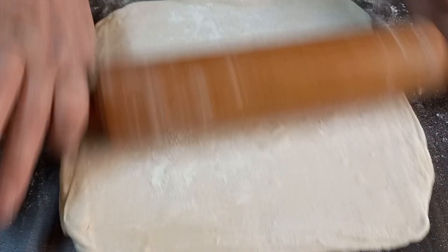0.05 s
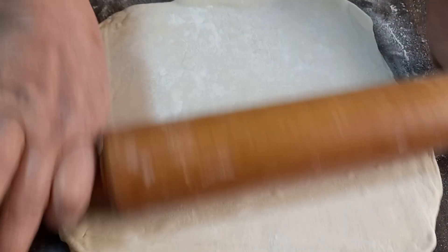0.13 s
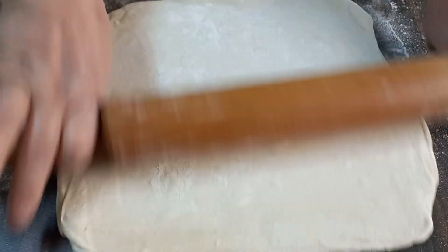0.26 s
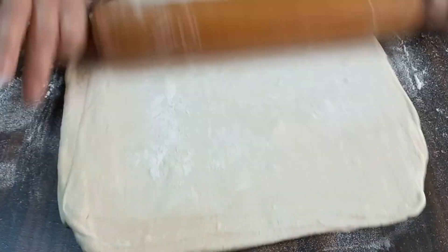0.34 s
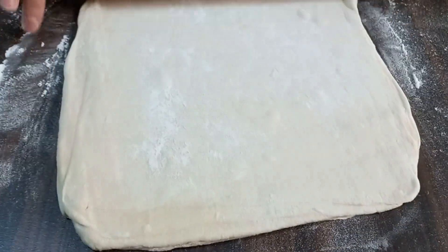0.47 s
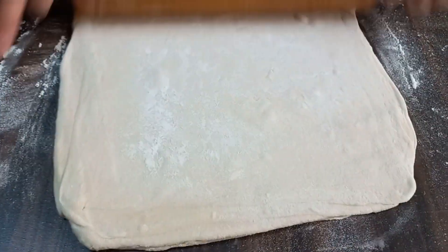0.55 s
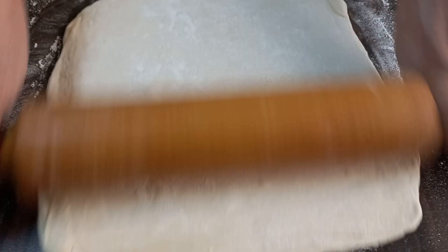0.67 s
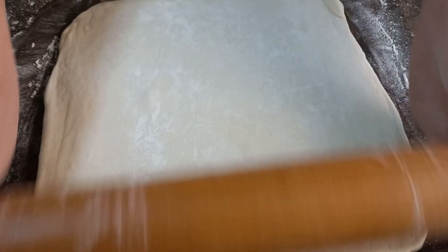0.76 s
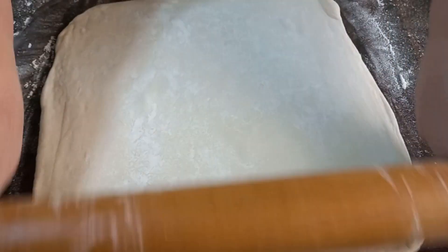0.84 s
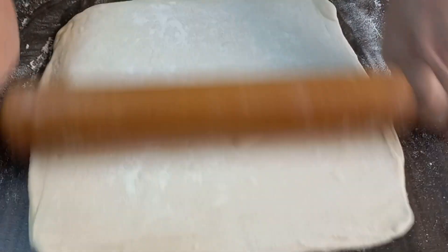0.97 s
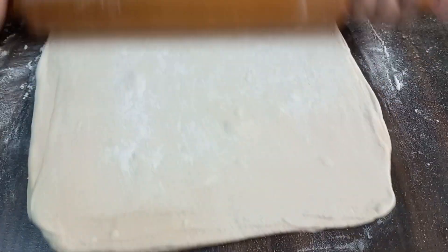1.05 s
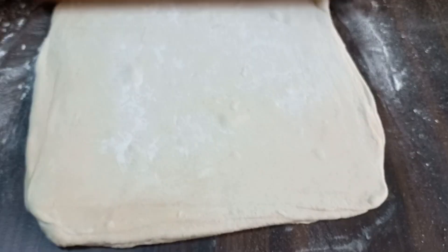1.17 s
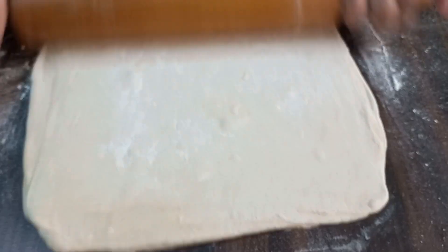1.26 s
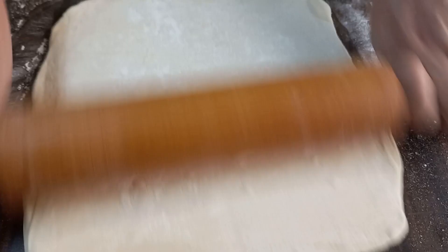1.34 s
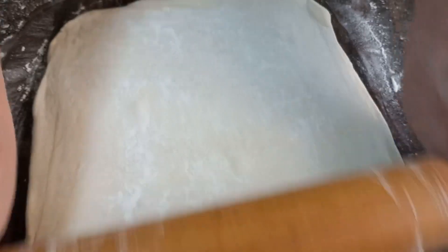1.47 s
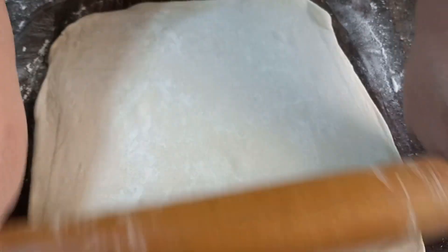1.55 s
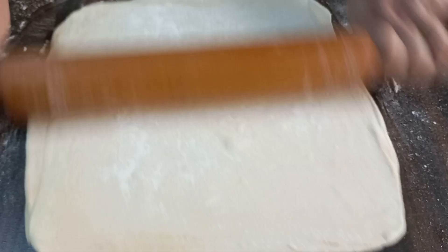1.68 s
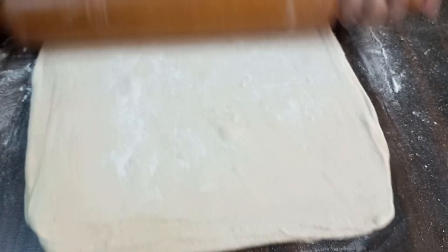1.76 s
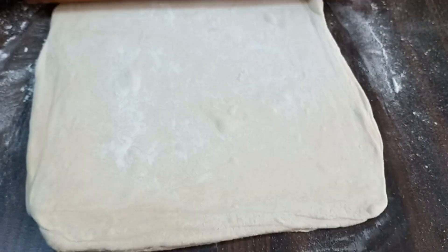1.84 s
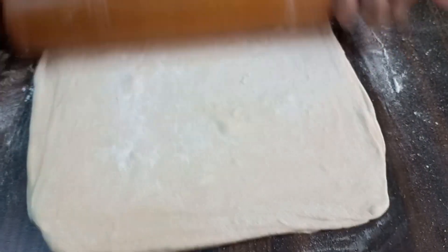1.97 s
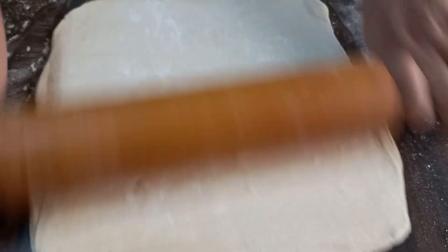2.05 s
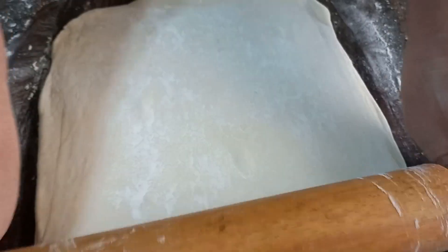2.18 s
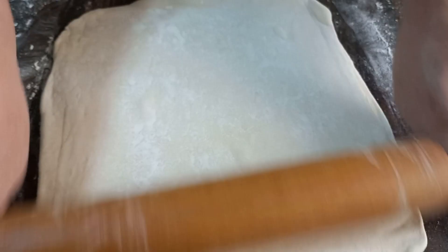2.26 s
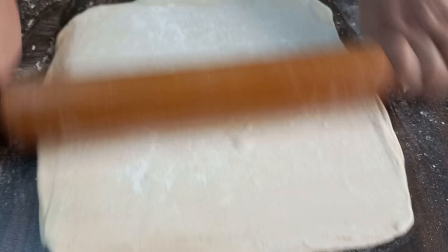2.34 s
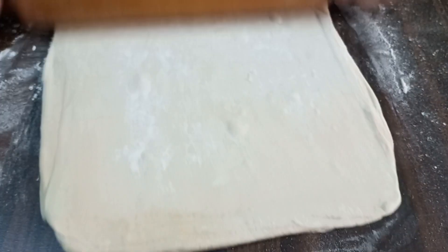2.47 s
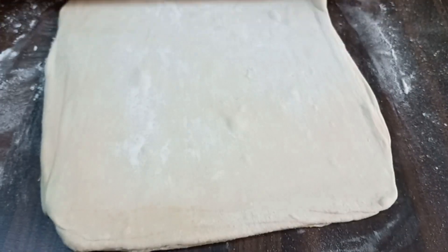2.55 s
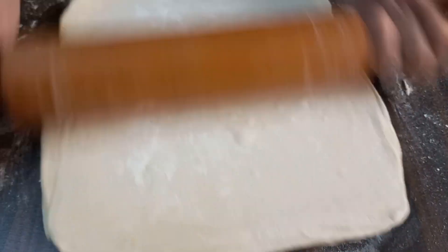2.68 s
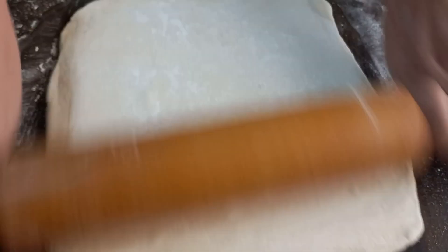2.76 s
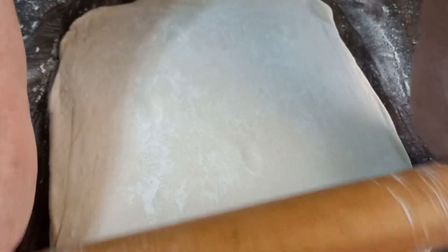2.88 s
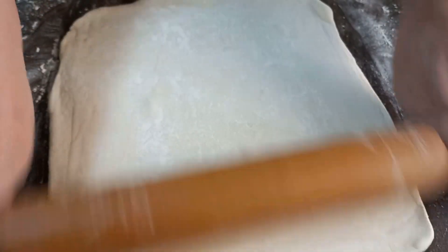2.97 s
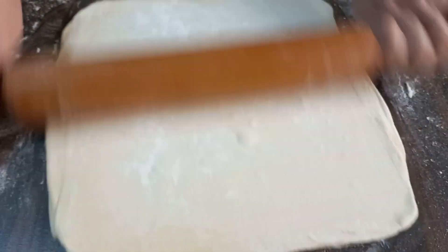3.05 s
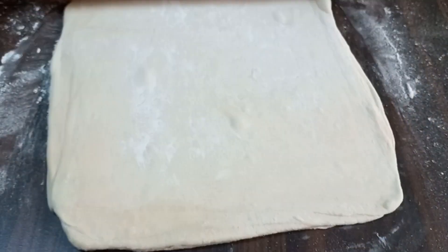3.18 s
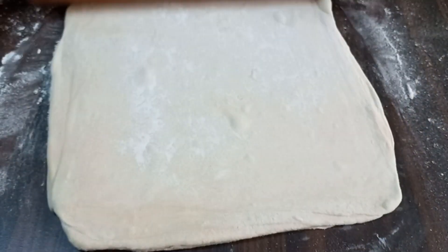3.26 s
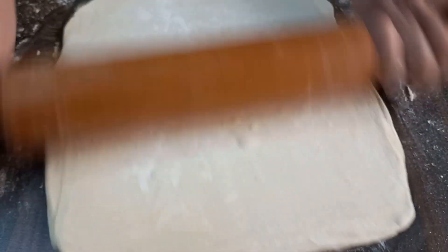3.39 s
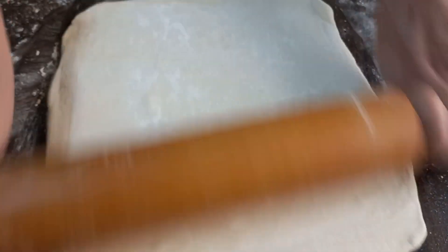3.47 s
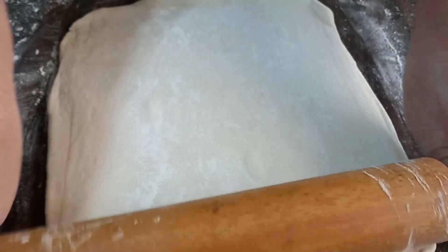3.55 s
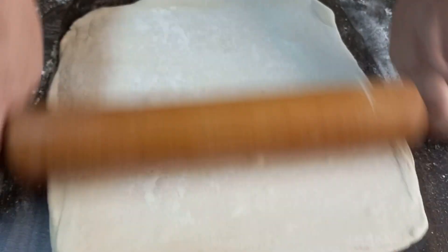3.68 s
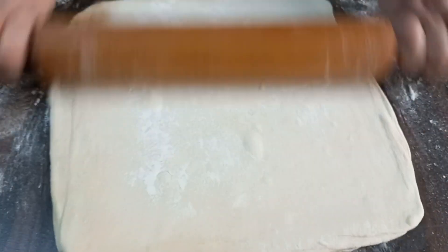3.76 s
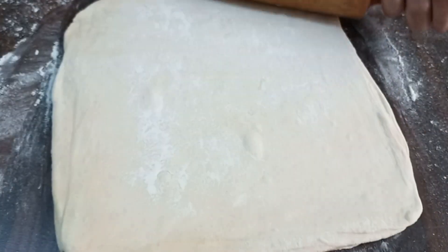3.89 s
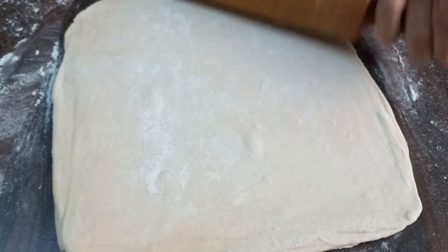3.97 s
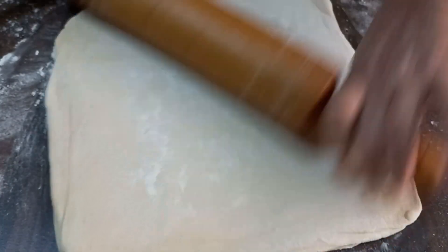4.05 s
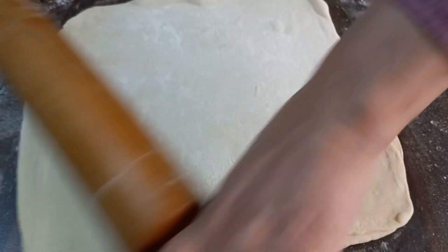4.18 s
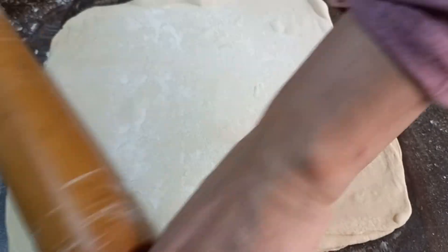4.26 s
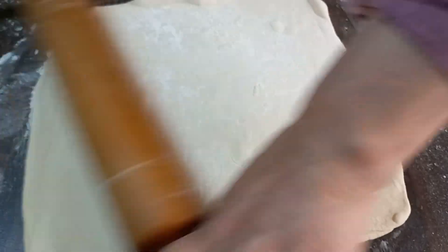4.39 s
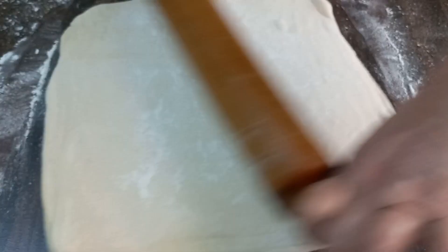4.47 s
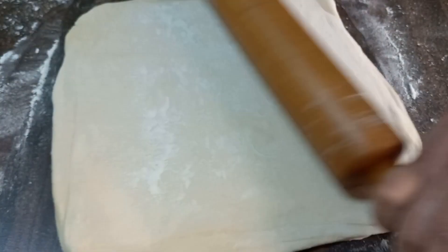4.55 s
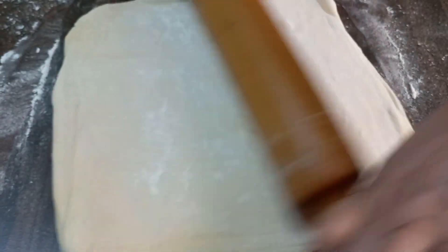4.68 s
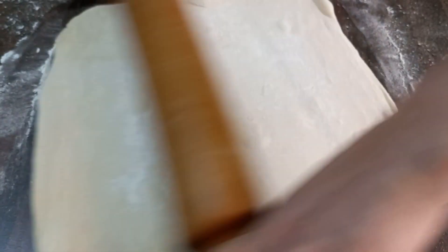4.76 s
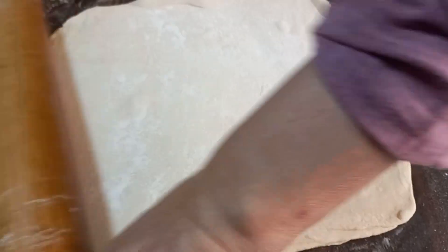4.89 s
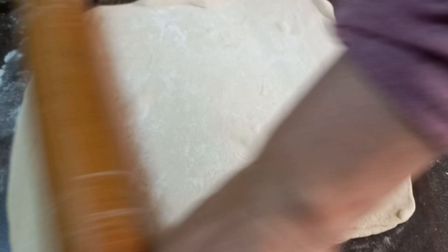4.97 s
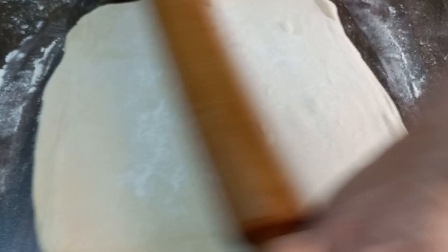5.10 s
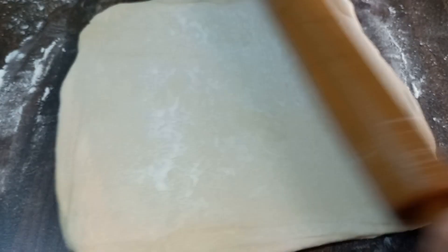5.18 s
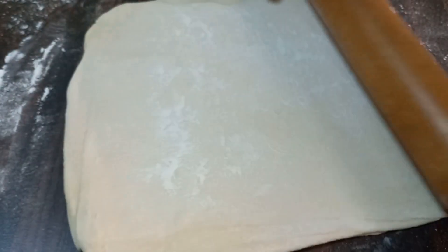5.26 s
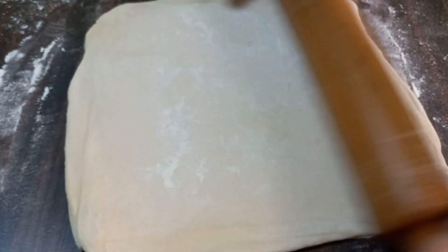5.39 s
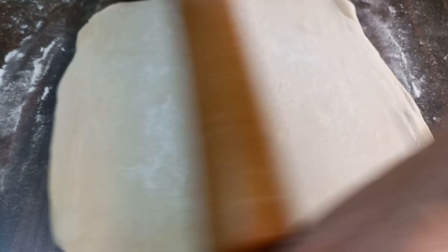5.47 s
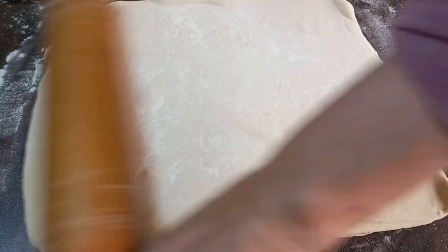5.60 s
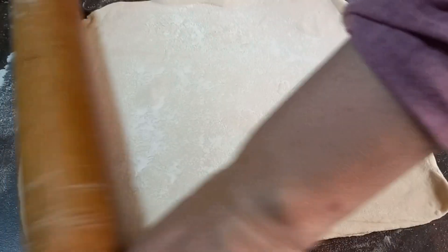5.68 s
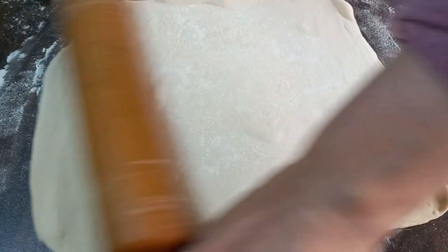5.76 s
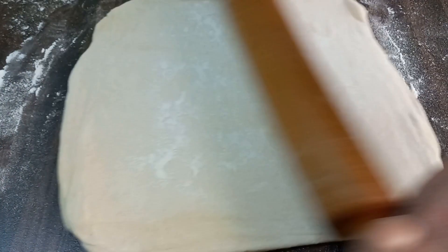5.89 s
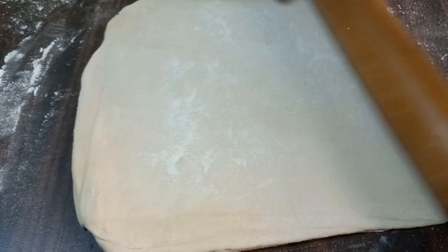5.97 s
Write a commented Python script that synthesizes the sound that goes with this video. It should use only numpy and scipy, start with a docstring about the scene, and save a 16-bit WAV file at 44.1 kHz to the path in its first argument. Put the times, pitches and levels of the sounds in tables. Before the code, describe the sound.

Close up in a kitchen, a wooden rolling pin goes to and fro over floured dough, about three strokes a second. Each stroke swells into a dry, hissing rub over a deep counter rumble and fades at the turn. Soft thuds and little skin squeaks dot the turns. Just before four seconds a hard knock rings the counter, then the strokes go sideways, lighter and hollower. A distant engine hums low.

```python
"""Rolling pin on a floured counter

In a kitchen, a wooden pin goes back and forth over floured dough, close to a pair of microphones.
Palms and flour hiss on the wood as shaped noise with tiny slips; the counter rumbles under the pin's weight.
Skin squeaks now and then, flour crunches, and knocks ring the counter's modes, once hard.
Outside, an engine slows to an idle: a low hum of a few orders, coloured by the walls."""
import sys
import numpy as np
from scipy import signal
from scipy.fft import rfft, irfft, next_fast_len
from scipy.io import wavfile
from scipy.ndimage import uniform_filter1d

SR = 44100
rng = np.random.default_rng(int(sys.argv[2]) if len(sys.argv) > 2 else 0)


def wrap_up_sound(samples):
    """Save the sound to the file named by the first command line argument, as 16-bit audio."""
    columns = np.atleast_2d(samples).T
    # keep every value between -1 and 1, then stretch to whole-number steps
    tamed = np.clip(columns, -1, 1)
    steps = np.round(tamed * 32767).astype(np.int16)
    wavfile.write(sys.argv[1], SR, steps)


N = 265923
TIME = np.arange(N) / SR


def gain_of(db):
    """Decibels to gain."""
    return 10 ** (np.asarray(db) / 20)


def evened(x):
    """Scales to an rms of 1."""
    return x / np.sqrt(np.mean(x ** 2) + 1e-20)


def read(points, hz):
    """A spectrum's value at hz, on a log-frequency axis."""
    f, value = np.transpose(points)
    return np.interp(np.log(hz + 1), np.log(f + 1), value)


def follow(rows):
    """Each column of a curve table, sample by sample."""
    s, *columns = np.transpose(rows)
    return [np.interp(TIME, s, column) for column in columns]


def add(mix, s, sound):
    """Mixes a sound in at s seconds."""
    part = mix[round(s * SR):][:len(sound)]
    part += sound[:len(part)]


def wander(rate_hz):
    """Slow chance with an rms of 1."""
    hz = np.fft.rfftfreq(N, 1 / SR)
    spectrum = rfft(rng.standard_normal(N)) * np.exp(-(hz / rate_hz) ** 2)
    return evened(irfft(spectrum, N))


def grains(per_s, spread_db, share):
    """Tiny slips of uneven size over a smooth wash, drawn twice; share is the slips' part of the power."""
    size_db = spread_db * np.minimum(rng.exponential(1, (2, N)), 4)
    sizes = gain_of(size_db) * rng.choice([-1, 1], (2, N))
    slips = evened(sizes * (rng.random((2, N)) < per_s / SR))
    wash = rng.standard_normal((2, N))
    return np.sqrt(share) * slips + np.sqrt(1 - share) * wash


# How alike a sound is at the two microphones: freq_hz, likeness [correlation]
LIKENESS = [(60, .98), (140, .98), (290, .86), (640, .5), (1400, .1), (3000, .08), (7000, 0), (15000, 0)]
# Which microphone it favours: freq_hz, left_minus_right_db
LEAN = [(60, 1), (130, -.5), (500, 0), (820, -4.5), (1250, -4.5), (1800, -8.5), (2200, -4.5), (2600, 3.5),
        (3200, 4), (4600, -2.5), (5700, -2), (7000, 2), (10000, 0.5), (15000, 0)]


def coloured(drive, spectrum):
    """Gives a drive its spectrum; the bass is alike at both microphones, the treble is not."""
    size = next_fast_len(N)
    hz = np.fft.rfftfreq(size, 1 / SR)
    a, b = rfft(drive, size)
    # mixing two independent noises by this angle sets their likeness
    turn = np.arccos(np.clip(read(LIKENESS, hz), -1, 1)) / 2
    mid, side = np.cos(turn) * a, np.sin(turn) * b
    lean = gain_of(read(LEAN, hz) / 2)
    pair = np.array([(mid + side) * lean, (mid - side) / lean])
    out = irfft(pair * gain_of(read(spectrum, hz)), size)[:, :N]
    return out / out.mean(0).std()


def steadied(x, seconds):
    """Evens out the slow swells of a noise and keeps its quick throb."""
    power = uniform_filter1d((x ** 2).mean(0), int(seconds * SR) + 1)
    return x / np.sqrt(power + 1e-9)


def patchy(x, patchy_db):
    """As the contact moves, narrow bands of the friction flare and fade within tens of milliseconds."""
    z = signal.stft(x, nperseg=512, noverlap=384)[2]
    patches = rng.standard_normal(z.shape[1:])
    patches = uniform_filter1d(patches, size=4, axis=0)  # across frequency
    patches = evened(uniform_filter1d(patches, size=9, axis=1))  # across time
    out = signal.istft(z * gain_of(patchy_db * patches), nperseg=512, noverlap=384)[1][:, :N]
    return out * x.std() / out.std()


def kitchen(x, wet_db, t60):
    """Direct sound plus dense reflections from tiles and cupboards."""
    t = np.arange(SR // 2) / SR
    build_up = np.clip(t / 0.017, 0, 1)
    taps = rng.standard_normal((2, len(t))) * gain_of(-60 * t / t60) * build_up
    taps /= np.linalg.norm(taps, axis=1, keepdims=True)
    tail = signal.fftconvolve(x[None], taps, axes=1)[:, :N]
    # long waves reach both microphones alike
    side = signal.sosfilt(signal.butter(2, 300, "high", fs=SR, output="sos"), tail[1])
    return x + gain_of(wet_db) * np.array([tail[0] + side, tail[0] - side])


# How each sound swells and dies in a stroke, by way of rolling, then by sound:
# begins, full, fades, gone [shares of the stroke], slope_db [dB per stroke]
SWELLS = { "push": {"rub": (0.056, 0.65, 0.49, 1.094, 0.84), "hiss": (-0.016, 0.46, 0.58, 1.063, -1.4),
          "fizz": (-0.0047, 0.43, 0.61, 1, -1.1), "weight": (0.15, 0.62, 0.54, 1.134, .5),
          "lumps": (-0.19, 0.58, 0.62, 1.325, 0.29)}, "pull": {"rub": (0.0092, 0.71, 0.56, 1.052, 0.8),
          "hiss": (-0.01, 0.49, 0.74, 1.007, -1.8), "fizz": (0.04, 0.4, 0.9, 0.96, -13),
          "weight": (0.084, 0.73, 0.51, 1.117, 0.39), "lumps": (.05, .63, .68, 1.1, 3),
          "whistle": (0.43, 1, .82, 0.94, -.8)}, "sideways": {"rub": (0.027, 0.49, 0.55, 1.026, .5),
          "hiss": (-0.052, 0.38, 0.69, 1.027, -1), "fizz": (-0.075, 0.44, 0.59, 1.05, -.5),
          "weight": (-0.14, 0.55, 0.47, 1.196, .5), "lumps": (-0.26, 0.62, 0.53, 1.25, 0.33),
          "whistle": (0.02, 0.36, .78, 1.02, -1)}}


def swell(sound, start, end, way):
    """One sound's gain over one stroke: it grows as the pin gathers speed, holds, and dies towards the turn."""
    begins, full, fades, gone, slope_db = SWELLS[way][sound]
    share = np.clip((TIME - start) / (end - start), begins, gone)
    rise = np.clip((share - begins) / max(full - begins, 1e-3), 0, 1)
    fall = np.clip((gone - share) / max(gone - fades, 1e-3), 0, 1)
    gain, on = np.zeros(N), rise * fall > 0
    speed = np.sin(np.pi / 2 * rise[on]) * np.sin(np.pi / 2 * fall[on])
    swell_power = 1.584  # loudness grows faster than the speed of the pin
    gain[on] = speed ** swell_power * gain_of(slope_db * (share[on] - .5))
    return gain


# Strokes from one turn of the pin to the next, levels relative: start_s, end_s, way,
# rub_db [palms], hiss_db [flour], weight_db [on the dough], lumps_db
STROKES = [ (-.24, 0.079, "pull", -54, -55.5, -37, -45), (0.082, 0.393, "push", -56.5, -56, -46, -56),
           (0.392, 0.742, "pull", -56.5, -56.5, -41.5, -48.5),
           (0.742, 1.057, "push", -56.5, -54.5, -38, -51.5),
           (1.051, 1.425, "pull", -55.5, -56, -40.5, -48.5), (1.431, 1.751, "push", -56, -54.5, -36, -52.5),
           (1.766, 2.11, "pull", -57, -57, -41.5, -53), (2.122, 2.44, "push", -55.5, -55, -39, -55.5),
           (2.441, 2.78, "pull", -56.5, -56.5, -43, -52), (2.792, 3.139, "push", -56, -55.5, -41.5, -54.5),
           (3.142, 3.474, "pull", -56, -55, -43.5, -53), (3.485, 3.82, "push", -56.5, -54, -49.5, -62),
           (3.79, 4.203, "sideways", -62.5, -60.8, -45, -57),
           (4.214, 4.52, "sideways", -62, -59.5, -51.5, -62.5),
           (4.538, 4.827, "sideways", -63, -60.5, -44, -57.5),
           (4.841, 5.214, "sideways", -58, -59, -48.5, -56.5),
           (5.231, 5.563, "sideways", -63, -58.5, -49, -61),
           (5.591, 6.022, "sideways", -58, -59.5, -46.5, -58.5)]
# The finest fizz over the hiss of the flour, by way of rolling: level_db
FIZZ_OVER_HISS = {"push": 5, "pull": 3.5, "sideways": 3.5}


def stroke_gains():
    """The gain of each sound of the pin through all the strokes."""
    whistle_db = -66.5  # before its lean to the left
    gains = {}
    for start, end, way, rub_db, hiss_db, weight_db, lumps_db in STROKES:
        levels = {"rub": rub_db, "hiss": hiss_db, "fizz": hiss_db + FIZZ_OVER_HISS[way],
                  "weight": weight_db, "lumps": lumps_db, "whistle": whistle_db}
        for sound in SWELLS[way]:
            stroke = gain_of(levels[sound]) * swell(sound, start, end, way)
            gains[sound] = gains.get(sound, 0) + stroke
    return gains


# Palms on the wood, to and fro, then sideways: freq_hz, level_db
RUB = [(300, -17), (600, -8), (820, -2.5), (1000, -4.5), (1280, -1.5), (1550, 0), (1900, -1.5),
       (2250, -5.5), (2550, -3.5), (3000, -9.5), (4200, -20)]
RUB_SIDEWAYS = [(300, -36), (600, -12.5), (900, -9), (1150, -7), (1450, 1), (1750, -2.5), (2050, -2),
                (2350, -5), (2700, -8), (3000, -13.5), (4200, -16.5)]
# Flour under the palms, and its finest top: freq_hz, level_db
HISS = [(2000, -26), (3300, -10.5), (3900, -6), (4500, 3), (5200, 0), (5800, 0), (6500, -1.5), (7400, -1),
        (8300, -8), (10000, -9), (15000, -8)]
FIZZ = [(6000, -26.5), (8300, -17), (9500, -7), (10800, -5), (12300, 2), (13500, 1), (14500, -1.5),
        (16000, 1)]


def rubbing(gains):
    """The turning pin slides under floury palms: dense slips that swell with each stroke and fade at the turn."""
    slips = grains(per_s=500, spread_db=3, share=0.16)
    # the pin is turned to roll across the dough and sounds hollower
    sideways = np.interp(TIME, [3.8, 4.3], [0, 1])
    rub = (1 - sideways) * coloured(slips, RUB) + sideways * coloured(slips, RUB_SIDEWAYS)
    flour = grains(per_s=4000, spread_db=3.0, share=0.19)  # fine powder slips far more often than skin
    hiss, fizz = coloured(flour, HISS), coloured(flour, FIZZ)
    return (patchy(rub, patchy_db=2.0) * gains["rub"]
            + patchy(hiss, patchy_db=2.5) * gains["hiss"]
            + patchy(fizz, patchy_db=3.5) * gains["fizz"])


def whistle(gains):
    """A narrow, whistly hiss in pulls and sideways strokes: noise in one resonance, stronger on the left."""
    peak = signal.iirpeak(2630, Q=7.5, fs=SR)
    once = signal.lfilter(*peak, rng.standard_normal((2, N)))
    band = signal.lfilter(*peak, once)
    return evened(band) * gains["whistle"] * gain_of([[1], [-8]])


# The counter under the pin's weight: freq_hz, level_db
RUMBLE = [(25, -43), (55, -17), (72, -8.5), (84, -1.5), (97, -3), (106, -6), (120, 1.5), (131, -5.5),
          (165, -12), (200, -9), (230, -25.5), (400, -46.5)]
# The hollow patter of lumps in the dough: freq_hz, level_db
BUMPS = [(100, -4), (150, 4), (175, 5), (198, 8), (225, 2), (290, 4), (350, -7), (400, -12), (470, -12.5),
         (540, -10), (700, -21), (1100, -39)]


def rolling(gains):
    """The pin's weight rumbles through the dough into the counter; lumps add a hollow patter."""
    weight = coloured(grains(per_s=90, spread_db=3, share=0.35), RUMBLE)
    rumble = steadied(weight, seconds=0.0273) * gains["weight"]
    lumps = coloured(grains(per_s=120, spread_db=3.5, share=0.46), BUMPS)
    bumps = steadied(lumps, seconds=.08) * gains["lumps"]
    # the counter's deep mode booms on from stroke to stroke
    boom = signal.lfilter(*signal.iirpeak(121.5, Q=26, fs=SR), rumble)
    return rumble + gain_of(3.0) * boom + gain_of(1.5) * bumps


# The engine outside slows to an idle and picks up a little: time_s, firing_hz [firings a second]
ENGINE_SPEED = [(0, 47.6), (.3, 47.6), (.8, 46.4), (1.0, 43), (1.33, 41), (1.5, 37.5), (2.15, 30.6),
                (3.5, 30.4), (4.35, 33.6), (4.65, 32.6), (5.1, 32.4), (6.03, 31.2)]
# Its load, level relative: time_s, level_db, brightness_db [dB per octave]
ENGINE_LOAD = [(0, -47.5, -1), (.8, -49.5, -2), (1.05, -51.5, 6), (1.3, -44, -5), (1.5, -51.5, -3),
               (1.72, -48, -1), (2.0, -53.5, -1), (3.3, -47.5, -2.5), (3.55, -57.5, 4), (4.5, -57, -2.5),
               (4.68, -51, 3.5), (6.03, -53.5, 1)]
# What the walls let through: freq_hz, level_db
WALLS = [(30, -25), (46, -18), (62, -1), (70, -12), (95, -31), (122, -13), (133, -5.5), (141, 3.5),
         (152, -3.5), (164, 3.5), (178, -9.5), (190, -1.5), (212, -15.5), (228, -6.5), (250, -22),
         (300, -40)]


def engine():
    """The low orders of a far engine, tilted by its load and coloured by the walls as its speed changes."""
    hz, = follow(ENGINE_SPEED)
    level_db, brightness_db = follow(ENGINE_LOAD)
    unsteady_hz = hz * (1 + 0.0023 * wander(rate_hz=6.6))
    phase = 2 * np.pi * np.cumsum(unsteady_hz) / SR
    hum = np.zeros(N)
    for k in range(1, 10):
        order_db = read(WALLS, k * hz) + brightness_db * np.log2(k / 4)  # tilts about the fourth order
        order_gain = gain_of(order_db + wander(rate_hz=14))
        hum += order_gain * np.sin(k * phase + 2 * np.pi * rng.random())
    return gain_of(level_db) * hum


# The quiet of the kitchen: freq_hz, level_db
ROOM_TONE = [(20, -13), (60, -4), (150, -5.5), (260, -4.5), (450, -21.5), (1000, -28), (1500, -19),
             (2300, -24.5), (2550, -22), (2750, -34), (2950, -33), (3800, -29.5), (4600, -25), (16000, -29)]


def room_tone():
    """Steady noise, strongest in the bass."""
    return gain_of(-64) * coloured(rng.standard_normal((2, N)), ROOM_TONE)


# Skin catches briefly on the wood, levels relative: start_s, level_db, pitch_hz
SQUEAKS = [(0.1742, -46, 1200), (0.5153, -41.5, 1200), (1.487, -55, 1870), (2.7078, -45, 1900),
           (3.1018, -49, 1880), (3.5714, -46.5, 1860), (3.777, -38.5, 1360), (4.9317, -60, 1900)]


def squeaks():
    """A few cycles of stick and slip that swell and die within milliseconds."""
    t, out = np.arange(SR // 20) / SR, np.zeros(N)
    rise_s = .0016
    for s, db, hz in SQUEAKS:
        envelope = t / rise_s * np.exp(1 - t / rise_s)
        add(out, s, gain_of(db - 6.5) * envelope * np.sin(2 * np.pi * hz * t))
    return kitchen(out, wet_db=-1, t60=0.17) * gain_of([[-2], [2]])  # leans right


# The counter's modes with the pin on it, undamped by hands: pitch_hz, level_db, t60_s
COUNTER = [(81, -28, 0.69), (94, -30, 0.43), (122, -13, 1.03), (152, -15, 0.4), (166, -16, 0.59),
           (198, -12, 0.15), (230, -27, 0.65), (259, -11, 0.19), (279, -22, 0.38), (292, -15, 0.09),
           (316, -11, 0.21), (350, -12, 0.29), (367, -18, 0.55), (394, -23, 0.09), (438, -18, 0.25),
           (460, -18, 0.35), (503, -14, 0.14), (535, -8, 0.13), (553, -17, 0.29), (588, -22, 0.22),
           (613, -16, 0.22), (636, -14, 0.28), (673, -17, 0.22), (708, -20, 0.2), (779, -18, 0.16),
           (820, -24, 0.16), (855, -25, 0.21), (955, -27, 0.2)]
# The pin lands, one end after the other, or drops off the edge of the dough, levels relative:
# start_s, level_db, contact_s
KNOCKS = [(0.6497, -42, 0.0013), (1.2728, -36.5, 0.0021), (1.977, -31.5, 0.0035), (2.6475, -39, 0.0039),
          (3.3507, -41, 0.0038), (3.7948, -14.5, 0.0018), (3.7984, -20, 0.0022), (3.8088, -33, 0.0019),
          (3.8206, -27, 0.0014), (4.0365, -50, 0.0056)]


def knocks():
    """Each blow is a soft push, cushioned by dough, that sets all the counter's modes ringing at once."""
    t = np.arange(SR) / SR
    ring = sum(gain_of(db - 60 * t / t60) * np.cos(2 * np.pi * hz * t) for hz, db, t60 in COUNTER)
    held_s = .31
    ring = ring * np.exp(-(t / held_s) ** 4)  # the hands close on the pin and damp the ring
    force = np.zeros(N)
    for s, db, contact in KNOCKS:
        push = np.sin(np.pi * np.minimum(t / contact, 1)) ** 2
        add(force, s, gain_of(db) * push / push.sum())
    # the board radiates little below its lowest mode
    low_cut = signal.butter(1, 50, "high", fs=SR, output="sos")
    thud = signal.sosfilt(low_cut, signal.fftconvolve(force, ring)[:N])
    # the grain of the wood adds a faint crack while the contact lasts
    crack_band = signal.butter(2, [1000, 2600], "band", fs=SR, output="sos")
    crack = signal.sosfilt(crack_band, force * rng.standard_normal(N))
    return kitchen(thud, wet_db=-8.5, t60=0.3) + kitchen(gain_of(11.5) * crack, wet_db=6, t60=0.35)


# A few grains of flour are crushed at once: start_s, level_db, decay_s [time constant]
CRUNCHES = [(3.102, -50.5, 0.0025), (3.798, -52.5, .008)]


def crunches():
    """Short decaying bursts of the flour's hiss."""
    t, level = np.arange(SR // 10) / SR, np.zeros(N)
    for s, db, decay in CRUNCHES:
        add(level, s, gain_of(db) * np.exp(-t / decay))
    return level * coloured(rng.standard_normal((2, N)), HISS)


def scene():
    """Pin and counter close by, the engine beyond the walls, over the quiet of the kitchen."""
    gains = stroke_gains()
    pin = rubbing(gains) + whistle(gains) + rolling(gains)
    background = engine() + room_tone()
    return pin + background + squeaks() + knocks() + crunches()


def record(dry):
    """The recorder's low cut and band limit."""
    cut = signal.sosfilt(signal.butter(2, 45, "high", fs=SR, output="sos"), dry)
    edge_hz = 15800
    band_limit = signal.firwin(1201, edge_hz, window=("kaiser", 9), fs=SR)
    return signal.oaconvolve(cut, band_limit[None], "same")


dry = scene()
out = record(dry)
wrap_up_sound(out)
```